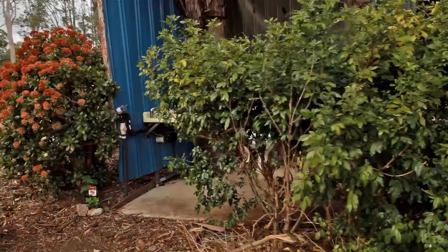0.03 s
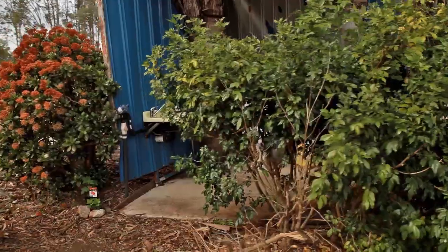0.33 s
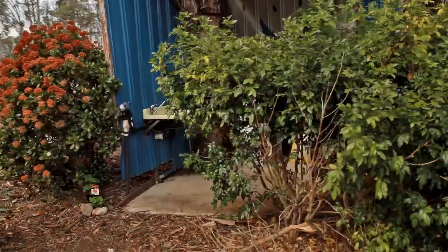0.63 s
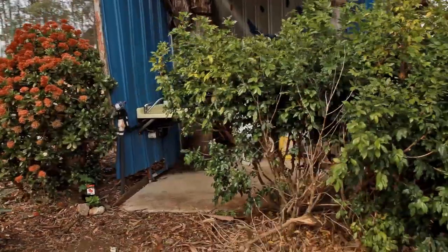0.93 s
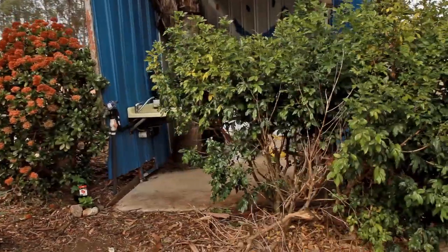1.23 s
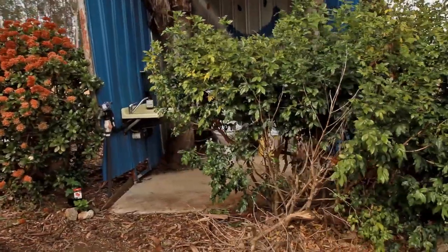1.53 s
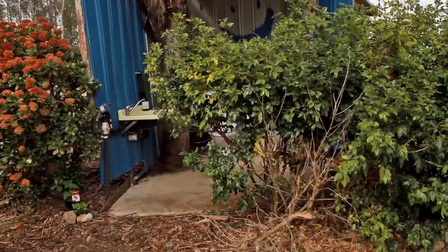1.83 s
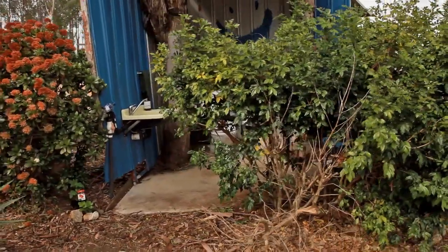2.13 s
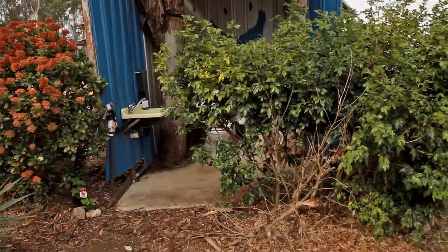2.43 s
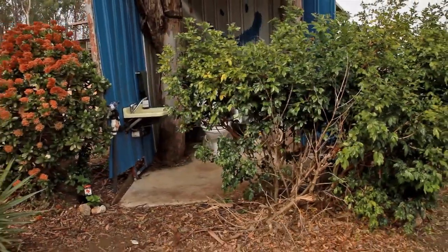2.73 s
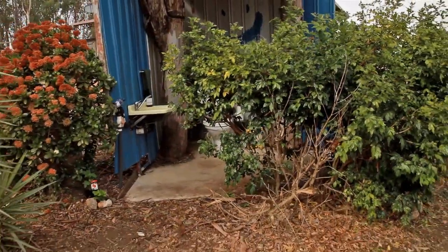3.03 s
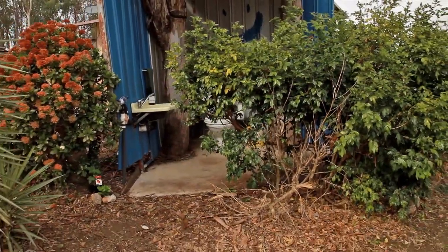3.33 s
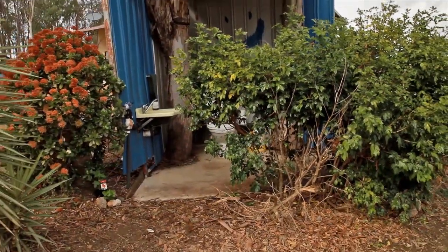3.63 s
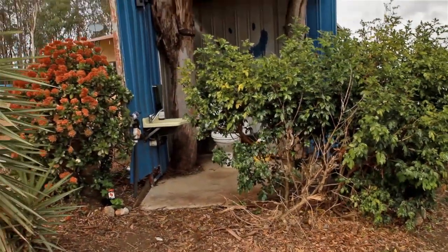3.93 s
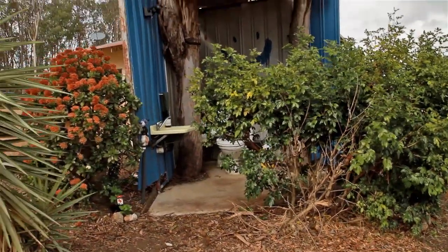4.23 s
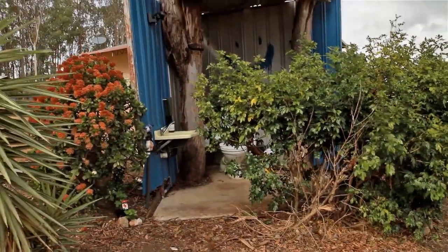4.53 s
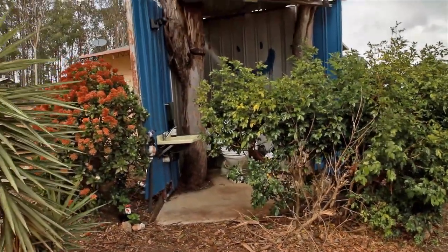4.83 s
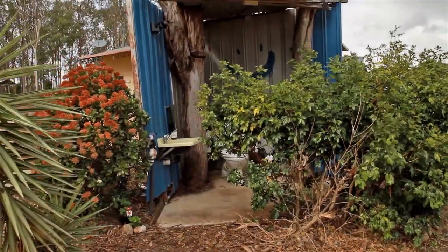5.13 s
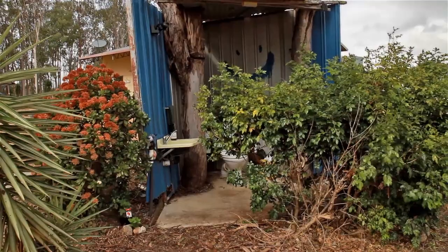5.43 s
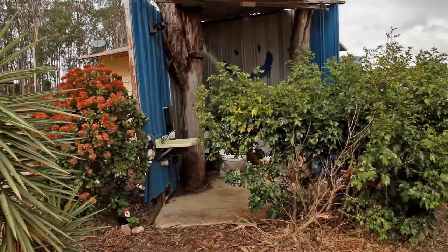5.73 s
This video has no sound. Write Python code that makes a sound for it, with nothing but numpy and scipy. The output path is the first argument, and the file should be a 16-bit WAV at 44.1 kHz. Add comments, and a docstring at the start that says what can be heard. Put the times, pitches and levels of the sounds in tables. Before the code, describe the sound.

In a breezy garden, wind hits a hand-held microphone with an uneven low rumble and sudden bumps, over the steady hiss of leafy bushes. A few soft steps scuff dry mulch, and a twig snaps sharply early on. The wind thumps hardest around the snap and again just past the middle, then eases. Small birds whistle and warble faintly among distant trees.

```python
"""A garden in a breeze, on a hand-held mono microphone carried slowly over dry mulch.
Eddies rumble and bump right at the microphone port, and the hardest of them push the limiter down.
Leaves hiss all around as they tick together. Underfoot, mulch scuffs and a twig snaps.
Small birds whistle far off among the trunks, and the electronics whine very faintly."""
import sys
import numpy as np
from scipy import signal
from scipy.fft import rfft, irfft
from scipy.io import wavfile
from scipy.ndimage import uniform_filter1d, map_coordinates

SR = 44100
rng = np.random.default_rng(int(sys.argv[2]) if len(sys.argv) > 2 else 0)


def wav_record(signal):
    """Record a signal, one row per channel, as 16-bit PCM in the file named by sys.argv[1]."""
    frames = np.transpose(np.atleast_2d(signal))
    bounded = np.clip(frames, -1, 1)
    # unit amplitude maps onto the largest positive 16-bit level
    quanta = np.round(bounded * 32767).astype(np.int16)
    wavfile.write(sys.argv[1], SR, quanta)


N = 255780
TIME = np.arange(N) / SR


def port_wind(rumble_db=0.2, flutter_db=6.5):
    """Wind right on the microphone port: a fluttering rumble with puffs, big eddies and blasts."""
    # Turbulent pressure at the port. Each row: frequency in Hz, level in dB.
    rumble_spectrum = [(15, -17), (30, -19), (60, 0), (110, 0.5), (150, -2.5), (230, -11), (350, -19.5),
                       (600, -31.5), (1200, -56)]
    # The hardest eddies, each a bump. Each row: middle in seconds, level in dB, centre in Hz.
    eddies = [(.315, -19.5, 118), (0.569, -16.5, 135), (1.034, -11.5, 133), (1.153, -11, 147),
              (1.41, -8, 198), (1.437, -2.5, 206), (1.466, -7.5, 140), (1.565, 3, 183), (1.583, -4, 384),
              (1.7, -1.5, 156), (2.013, -13, 122), (2.026, -15.5, 178), (2.135, -17.5, 134),
              (2.748, -2, 162), (2.947, -9, 134), (3.372, -15, 211), (3.423, -3.5, 225), (3.519, -10, 148),
              (3.561, -8, 580), (3.591, 2.5, 159), (3.607, -3, 150), (3.76, -8.5, 137), (4.007, -12.5, 236),
              (4.135, -8.5, 167), (5.365, -10, 130), (5.724, -15, 134)]
    buffet_db = buffeting()
    lulls = np.minimum(drift(35), .5)  # the flow keeps dropping out for a moment
    strength = from_db(buffet_db + rumble_db + flutter_db * lulls)
    rumble = strength * turbulence(rumble_spectrum, even_s=0.25)
    return rumble + splutter(eddies) + puffs(buffet_db) + eddy_swings(eddies) + blasts()


def buffeting(calm_db=-49):
    """Strength of the turbulence at the port in dB: bell-shaped gusts over a calm flow."""
    # Gusts that swell and fade. Each row: middle in seconds, half length in seconds, level in dB.
    gusts = [(0.043, 0.033, -26.5), (0.204, 0.042, -31.5), (0.462, 0.062, -29), (0.674, 0.027, -33.5),
             (0.994, 0.042, -28.5), (1.152, 0.054, -24), (1.438, 0.049, -21), (1.604, .085, -23.5),
             (1.767, 0.047, -25), (1.905, 0.076, -36), (2.202, .035, -30.5), (2.64, .11, -30.5),
             (2.92, 0.087, -29.5), (3.06, 0.045, -29.5), (3.538, 0.19, -25), (3.797, 0.049, -23.5),
             (3.932, 0.023, -25.5), (4.09, 0.067, -28.5), (4.405, 0.049, -27), (4.531, 0.059, -28.5),
             (5.346, 0.26, -35.5), (5.755, 0.077, -30.5)]
    power = from_db(calm_db) ** 2 + sum((from_db(db) * bump(s, half)) ** 2 for s, half, db in gusts)
    return 10 * np.log10(power)


def eddy_swings(eddies, steepness=4.0, reach_s=.04):
    """Each eddy is one swing of pressure; a smaller one passes sooner and sounds higher."""
    out = np.zeros(N)
    for (s, db, hz), turn in zip(eddies, rng.random(len(eddies))):
        passing_s = (2 * steepness - 1) / (4 * np.pi * hz)
        near = slice(max(int((s - reach_s) * SR), 0), int((s + reach_s) * SR))
        # the shape of the swing depends on how the eddy happens to meet the port
        swing = np.exp(2j * np.pi * turn) / (1 - 1j * (TIME[near] - s) / passing_s) ** steepness
        out[near] += from_db(db) * swing.real
    return out


def blasts(edge_s=0.0057):
    """Air blows straight into the port in two short, ragged bursts."""
    # Each row: start in seconds, length in seconds, level in dB.
    bursts = [(3.512, 0.0524, -10), (3.594, 0.055, -9)]
    # Pressure of a direct hit. Each row: frequency in Hz, level in dB.
    blast_spectrum = [(30, -42), (70, -9), (140, 5), (290, -5), (400, -6), (900, -22), (1400, -31.5),
                      (2500, -65)]
    blowing = sum(from_db(db) * np.clip(np.minimum(TIME - s, s + length - TIME) / edge_s, 0, 1)
                  for s, length, db in bursts)
    return blowing * turbulence(blast_spectrum, even_s=0.005)


def puffs(buffet_db, count=175, puff_db=8.0, spread_db=6, puff_hz=150):
    """Small eddies at uneven moments follow the strength of the turbulence that carries them."""
    jitter, strength, size = rng.random((count, 3)).T
    when = (np.arange(count) + jitter) / count * TIME[-1]
    db = np.interp(when, TIME, buffet_db) + puff_db + spread_db * (2 * strength - 1)
    return eddy_swings(np.column_stack([when, db, puff_hz * 2 ** (size - .5)]))


def splutter(eddies, gain_db=-16, breakup_hz=200, half_s=0.0043):
    """Eddies break up at the rim of the port, the small, fast ones most of all."""
    # Air tearing at the rim. Each row: frequency in Hz, level in dB.
    rim_spectrum = [(250, 13), (450, 14.5), (750, -15), (1100, -5.5), (1500, -18), (2500, -33)]
    breaking = sum(from_db(db) * min(hz / breakup_hz, 1) ** 4 * bump(s, half_s) for s, db, hz in eddies)
    return from_db(gain_db) * breaking * turbulence(rim_spectrum, even_s=0.004)


def foliage(leaf_db=-41.5, grain_db=-7, flutter_db=0.48, far_db=-40, far_follows=0.81,
            freshen_db=2, freshen_middle_s=2.2, freshen_s=0.87):
    """Near leaves tick together in the hiss of many more, over far trees; the breeze freshens once."""
    # Bright leaves close by. Each row: frequency in Hz, level in dB.
    leaf_spectrum = [(700, -9.5), (1600, -1), (3200, -0.5), (5000, -2), (7800, -5.5), (10000, -5),
                     (12000, -3.5), (14000, -8.5), (15500, -15.5)]
    # The dull wash of distant trees. Each row: frequency in Hz, level in dB.
    far_spectrum = [(30, 5.5), (70, 9.5), (170, -14), (350, -3), (600, -5), (900, -6), (1500, -9),
                    (3000, -22.5)]
    breeze_db = freshen_db * np.clip(.5 + (TIME - freshen_middle_s) / freshen_s, 0, 1)
    contacts = rng.standard_normal(N) + from_db(grain_db) * grains(per_s=5000, spread_db=5.0)
    near = from_db(leaf_db + breeze_db + flutter_db * drift(25)) * coloured(contacts, leaf_spectrum)
    far = from_db(far_db + far_follows * breeze_db) * coloured(rng.standard_normal(N), far_spectrum)
    return near + far


def footsteps():
    """Below the microphone, mulch crunches and dry leaf litter swishes as a sole presses down."""
    # Crunching mulch and swishing litter. Each row: frequency in Hz, level in dB.
    mulch_spectrum = [(900, 0), (1700, 6), (2600, 3), (4000, -11), (8000, -38)]
    litter_spectrum = [(2500, -6), (6000, -4), (9500, -4.5), (12500, 0.5), (14500, -7), (15700, -4)]
    # Sole on ground. Each row: middle in seconds, half length in seconds, crunch in dB, swish in dB.
    scuffs = [(0.518, 0.16, -44.5, -46), (1.352, 0.1, -44.5, -42.5), (1.882, 0.13, -45, -43.5),
              (1.923, 0.0062, -34.5, -49), (1.949, 0.014, -48, -38.5), (2.307, 0.04, -43.5, -46),
              (3.192, 0.11, -60, -42), (3.475, 0.1, -47, -43.5)]
    mulch = coloured(grains(per_s=6000, spread_db=-1), mulch_spectrum)
    litter = coloured(grains(per_s=6000, spread_db=-1), litter_spectrum)
    return sum(bump(s, half) * (from_db(crunch_db) * mulch + from_db(swish_db) * litter)
               for s, half, crunch_db, swish_db in scuffs)


def twig_snaps():
    """A twig breaks underfoot: its fibres crack and the wood rings, dying almost at once."""
    # Resonances of splitting fibres and of wood. Each row: centre in Hz, width in Hz, dB per pass.
    fibre_modes = [(4900, 900, -1), (7000, 2200, -3), (9400, 1800, -.5), (11850, 700, 2.8),
                   (14150, 800, 2.2)]
    wood_modes = [(450, 420, 2.5), (2120, 520, 1)]
    # Breaks. Each row: start in seconds, crack in dB, wood ring in dB, seconds to fall 60 dB.
    snaps = [(1.514, -16.5, -12, 0.011), (1.524, -25.5, -53, 0.033), (1.533, -35, -46, 0.14),
             (1.949, -30, -53, .014)]
    crack, wood = ringing_noise(fibre_modes), ringing_noise(wood_modes)
    out = np.zeros(N)
    for s, crack_db, wood_db, t60 in snaps:
        dying = (TIME >= s) * from_db(-60 * np.clip((TIME - s) / t60, 0, 2))
        out += dying * (from_db(crack_db) * crack + from_db(wood_db) * wood)
    return out


def birds(echo_db=-6, echo_t60_s=.55):
    """Distant gliding whistles, some clean and some raspy, followed by their scatter from the trunks."""
    # The nearer birds. Each row: start and length in seconds, first, middle and last pitch in Hz,
    # level in dB, rasp as a share of pitch.
    chirps = [(.86, .06, 2480, 2820, 2950, -38, .002), (1.06, .11, 2330, 2400, 2420, -42.5, .04),
              (1.782, .04, 4950, 4850, 4500, -38, .045), (2.465, .045, 2850, 3200, 4700, -36, .005),
              (2.77, .095, 3500, 4300, 4650, -43, .015), (3.365, .045, 2700, 2600, 2530, -40, .02),
              (3.715, .032, 3850, 4250, 4430, -38, .003), (3.808, .062, 4470, 4230, 3680, -36, .003),
              (4.365, .085, 3620, 3780, 3750, -41, .035), (5.77, .03, 4900, 4850, 4750, -43, .02)]
    song, wobble = np.zeros(N), drift(450)
    for s, length, first, middle, last, db, rasp in chirps + warbler():
        on = (TIME >= s) & (TIME < s + length)
        progress = (TIME[on] - s) / length
        glide = np.polyval(np.polyfit([0, .5, 1], [first, middle, last], 2), progress)
        pitch = glide * (1 + rasp * wobble[on])
        swell = np.sqrt(np.abs(np.sin(np.pi * progress)))
        song[on] += from_db(db) * swell * np.sin(2 * np.pi * np.cumsum(pitch) / SR)
    trunks = rng.standard_normal(SR) * from_db(-60 * TIME[:SR] / echo_t60_s)
    echo = signal.fftconvolve(song, trunks / np.linalg.norm(trunks))[:N]
    return song + from_db(echo_db) * echo


def warbler(every_s=.07, note_s=.05, rise_octaves=.22, range_octaves=0.19, rasp=0.035, unevenness=.3):
    """Chirp rows for a warbler deep in the trees: quick, uneven runs of notes that tend to sweep up."""
    # Its phrases. Each row: start and end in seconds, centre pitch in Hz, level in dB.
    phrases = [(2.17, 2.88, 2950, -42.5), (2.95, 3.23, 3800, -44.5), (4.5, 4.64, 2200, -46)]
    notes, sweep = [], rise_octaves * np.array([-.5, 0, .5])
    for start, end, hz, db in phrases:
        for s in np.arange(start, end - note_s / 2, every_s):
            late, *wander = rng.uniform(-1, 1, 4)
            glide = hz * 2 ** (sweep + range_octaves * np.array(wander))
            notes.append((s + late * unevenness * every_s, note_s, *glide, db, rasp))
    return notes


def electronics_whine(hz=15653, rms_db=-60):
    """The electronics add one faint, steady, very high tone."""
    return from_db(rms_db) * np.sqrt(2) * np.sin(2 * np.pi * hz * TIME)


def from_db(db):
    """Decibels to gain."""
    return 10 ** (np.asarray(db) / 20)


def rms_one(x):
    """Scale to rms 1."""
    return x / np.sqrt(np.mean(x ** 2) + 1e-20)


def bump(s, half):
    """A bell-shaped swell of height 1, centred on s seconds."""
    return np.exp(-np.minimum(((TIME - s) / half) ** 2, 20))


def drift(rate):
    """A smooth random wander of rms 1 that changes about rate times a second."""
    knots = rng.standard_normal(4096)
    return rms_one(map_coordinates(knots, [TIME * rate], order=2, mode="wrap"))


def grains(per_s, spread_db):
    """Tiny contacts of uneven strength at random moments; rms 1."""
    sizes = from_db(spread_db * np.minimum(rng.exponential(1, N), 4)) * rng.choice([-1, 1], N)
    return rms_one(sizes * (rng.random(N) < per_s / SR))


def coloured(x, spectrum):
    """Give a white signal a spectrum that falls away beyond its ends; rms 1."""
    hz, db = np.transpose(spectrum)
    f = np.maximum(np.arange(N // 2 + 1) * SR / N, 1)
    skirts = 1 / np.sqrt((1 + (hz[0] / 2 / f) ** 4) * (1 + (f / hz[-1] / 2) ** 4))
    shape = from_db(np.interp(np.log(f), np.log(hz), db))
    return rms_one(irfft(rfft(x) * skirts * shape, N))


def evened(x, even_s):
    """Hold the strength of a noise near 1 over spans of even_s seconds."""
    size = int(even_s * SR) + 1
    return x / np.sqrt(uniform_filter1d(uniform_filter1d(x * x, size), size) + 1e-6)


def turbulence(spectrum, even_s):
    """Lumpy pressure noise whose strength is held even."""
    return evened(coloured(rng.standard_normal(N), spectrum), even_s)


def resonate(x, modes):
    """Parallel resonances with alternating signs."""
    out = np.zeros(N)
    for k, (hz, width, db) in enumerate(modes):
        r = np.exp(-np.pi * width / SR)
        poles = [1, -2 * r * np.cos(2 * np.pi * hz / SR), r * r]
        out += (-1) ** k * from_db(db) * (1 - r * r) / 2 * signal.lfilter([1, 0, -1], poles, x + 1e-18)
    return out


def ringing_noise(modes):
    """Noise passed twice through the same resonances and held at an even strength."""
    ringing = resonate(resonate(rng.standard_normal(N), modes), modes)
    return evened(rms_one(ringing), even_s=0.0021)


def limiter(x, threshold_db=-17, listen_s=0.16, attack_s=0.034, release_db_per_s=15):
    """Sustained loudness turns the gain down and it creeps back, so the hiss ducks after hard buffets."""
    def smooth(v, seconds):
        r = np.exp(-1 / (seconds * SR))
        return signal.lfilter([1 - r], [1, -r], v)
    level_db = 10 * np.log10(smooth(np.mean(x * x, axis=0), listen_s) + 1e-12)
    over_db = np.maximum(level_db - threshold_db, 0)
    held_db = np.maximum.accumulate(over_db + release_db_per_s * TIME) - release_db_per_s * TIME
    return x * from_db(-smooth(held_db, attack_s))


def scene():
    """Everything reaches one microphone, the same in both channels."""
    mono = foliage() + port_wind() + footsteps() + twig_snaps() + birds() + electronics_whine()
    return np.array([mono, mono])


def record(dry, cutoff_hz=15750):
    """The recorder limits the level, rounds the peaks and cuts the top steeply."""
    lowpass = signal.ellip(12, .1, 80, cutoff_hz, fs=SR, output="sos")
    return signal.sosfilt(lowpass, np.tanh(limiter(dry)))


dry = scene()
out = record(dry)
wav_record(out)
```